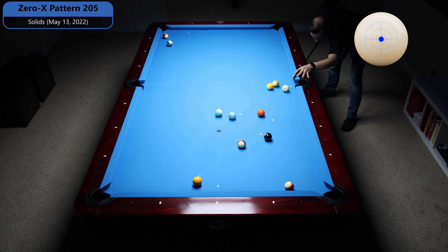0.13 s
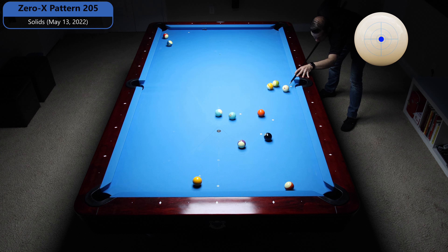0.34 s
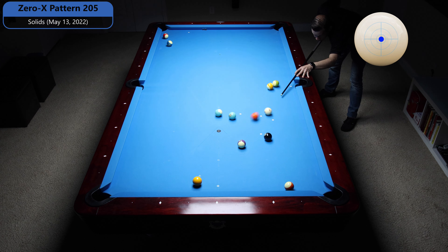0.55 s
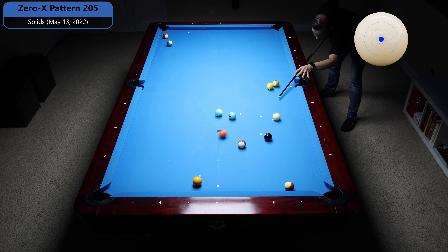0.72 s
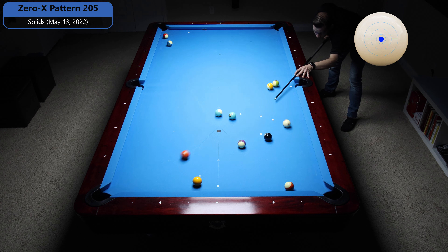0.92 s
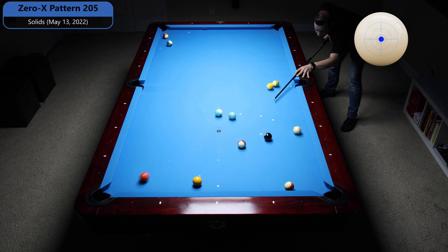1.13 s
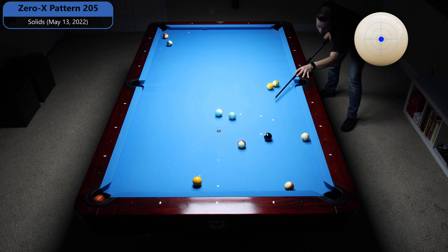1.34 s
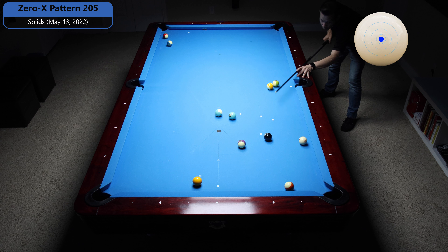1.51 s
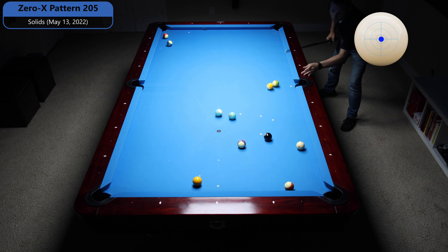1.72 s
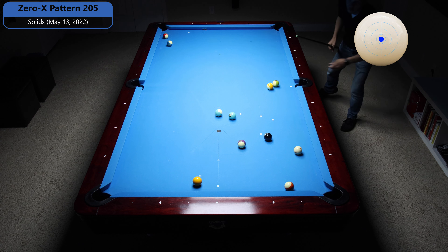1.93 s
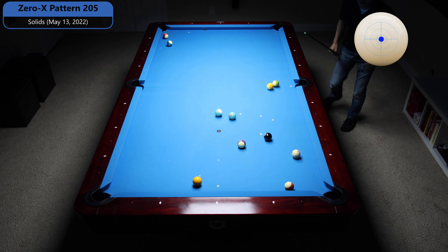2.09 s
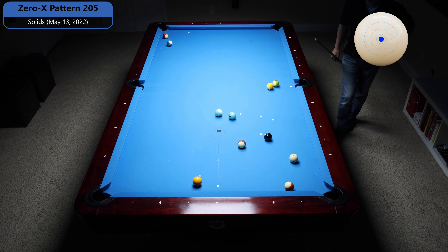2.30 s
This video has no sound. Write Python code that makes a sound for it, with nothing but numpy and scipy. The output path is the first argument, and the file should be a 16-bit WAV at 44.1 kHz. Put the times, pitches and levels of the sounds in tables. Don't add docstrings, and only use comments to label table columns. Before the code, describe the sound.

Pool shot: cue tip thumps, balls clack sharply, then a ball drops knocking into a pocket

```python
import sys
import numpy as np
from scipy import signal
from scipy.fft import rfft, irfft
from scipy.io import wavfile

SR = 44100
rng = np.random.default_rng(int(sys.argv[2]) if len(sys.argv) > 2 else 0)


def transcribe(u):
    v = np.clip(np.atleast_2d(u).T, -1, 1)
    q = np.round(v * 32767).astype(np.int16)
    wavfile.write(sys.argv[1], SR, q)


def volts(x):
    e = np.asarray(x, float) / 20
    return 10 ** e


N = 103767

# [t/s, level/dB, contact time/ms, ball ring f/Hz]
BALL_HITS = [
    (.6351, 0, .31, 2180),
    (1.5557, -7.5, 0.37, 2865),
    (1.7278, -17.5, 0.4, 2600),
    (1.8445, -23, 0.52, 2250),
    (1.8862, -25.5, 0.49, 2040),
    (1.915, -34, 0.31, 2060),
    (1.6165, -48, .1, 8000),
]
# [t/s, puff level/dB, contact time/ms, frame level/dB, scuff level/dB]
SOFT_BLOWS = [(0.4844, -11, 1.66, -13, -27.5), (0.6349, -12, 0.86, -39.5, -58),
              (1.367, -40, 1.73, -35, -95), (1.384, -50, 7.5, -32.5, -73),
              (1.485, -20.5, 1.17, -9.5, -24.5), (1.4925, -5, 2.03, -4.5, -42),
              (1.5013, -8, 1.86, -13, -49.5), (1.557, -7, 1.11, -12.5, -27.5),
              (1.7282, -13.5, 0.77, -22.5, -45), (1.885, -27.5, 1.37, -33.5, -37.5),
              (1.974, -35, 2.12, -32.5, -47), (2.029, -42.5, 1.94, -42, -53.5), (2.084, -53, 3.3, -47, -46)]
# [f/Hz, time to fall 60 dB/s, level struck on bed/dB, level struck at pocket/dB]
FRAME_MODES = [(72, 0.62, -27, -20.5), (180.2, 0.2, -9.5, -12.5), (225, 0.2, -9, -18.5),
               (302.8, 0.18, 1, 1), (462.3, .25, -8.5, -3.5), (361.5, 0.22, -7, -6), (431, 0.083, -6, -1),
               (485, 0.34, -4.5, -5), (547, 0.2, -5, -1.5), (606.5, 0.36, -9.5, -6.5), (671.7, .15, -9, -9),
               (721, 0.26, 0.5, -6.5), (820.3, 0.19, -21.5, -29.5), (1127, 0.34, -11, 1)]
# [f/Hz, width/Hz, level/dB]
SCUFF_BANDS = [(2690, 1920, 5), (1500, 900, 5), (4700, 2700, -8), (7100, 670, -15.5)]
# [t/s, level/dB]
ROLL_LEVEL = [(.5, -81), (.66, -38), (.85, -60.5), (0.969, -52.5), (1.12, -54), (1.22, -55), (1.36, -54.5),
              (1.5, -43), (1.9, -63.5), (2.34, -64)]
# [f/Hz, width/Hz, level/dB]
ROLL_TONES = [(105, 30, -6), (155, 30, -8), (230, 24, 0), (295, 40, -10), (370, 60, -18), (600, 300, -26)]
# [f/Hz, time to fall 60 dB/s, level/dB]
ROOM_DECAY = [(103, 1, -23.5), (270, 0.53, -28.5), (600, 0.45, -31), (1420, 0.3, -23.5),
              (3240, 0.37, -28.5), (6050, 0.46, -32.5), (11100, .26, -15.5)]
# [delay/ms, level/dB]
BED_REFLECTIONS = [(1.3, -8), (5.3, -16), (8.05, -5), (13.1, -12), (16.6, -15), (20.6, -13), (23.6, -9),
                   (29.4, -14)]
# [delay/ms, level/dB]
POCKET_REFLECTIONS = [(1.2, -10), (7.2, -10), (12.5, -11), (19.4, -9), (23, -10), (32, -14)]
LATE_LEVEL = [-0.5, -1]
# [f/Hz, level per Hz/dB]
NOISE_COLOUR = [(12, -39), (20, -19.5), (108, -1), (179, -19), (237, -42.5), (1050, -37), (1350, -36),
                (15200, -40), (16500, -50)]
# [f/Hz, width/Hz, level/dB]
DUCT_TONES = [(79.6, 5.2, -53.5), (113, 8.2, -57.5), (143.2, 32, -60.5)]
MOVE_TIMES = [.6, 1, 1.54, 1.7, 1.82]


def unit(x):
    return x / np.sqrt(np.mean(x ** 2) + 1e-20)


def peak(x, hz, width_hz):
    r = np.exp(-np.pi * width_hz / SR)
    return signal.lfilter((1 - r * r) / 2 * np.array([1, 0, -1]), [1, -2 * r * np.cos(2 * np.pi * hz / SR), r * r], x)


def lowpass(x, order, hz):
    return signal.lfilter(*signal.butter(order, hz, fs=SR), x)


def shaped(size, gain):
    hz = np.maximum(np.arange(size // 2 + 1) * SR / size, 1)
    return irfft(rfft(rng.standard_normal(size)) * gain(hz), size)


def add(out, s, sound):
    i = int(s * SR)
    out[i:i + len(sound)] += sound[:N - i]


def clack(db, ms, hz):
    t = np.arange(1024) / SR
    force = np.sin(np.pi * np.clip(t * 1000 / ms, 0, 1)) ** 1.5 + 1e-18
    jolt = -np.diff(force, prepend=0)
    cut_hz = 4300 * hz / 2400
    dull = signal.sosfilt(signal.butter(4, cut_hz, fs=SR, output="sos"), jolt)
    body = peak(peak(dull, hz, 1300), hz, 2700)
    skirt = peak(dull, 1600, 1600)
    spray = rng.standard_normal(1024) * volts(-60 * t / 0.008)
    edge = peak(spray, 6400, 3000) + 0.33 * peak(spray, 9100, 3600) + 0.29 * peak(spray, 16000, 3000)
    edge = peak(edge, 6300, 12000)
    parts = ((body, 0), (skirt, -16.5), (edge, -35))
    return volts(db) * sum(volts(part_db) * part / np.abs(part).max() for part, part_db in parts)


def frame_ring(push, luck, place):
    t = np.arange(SR) / SR
    twin_spread, pocket_t60_share, rise_cycles = 0.05, 0.67, 0.87
    modes = np.zeros(SR)
    for k, ((hz, t60, *levels), (level_luck, pitch_luck)) in enumerate(zip(FRAME_MODES, luck)):
        fade = volts(levels[place] + 2 * level_luck - 60 * t / (t60 * pocket_t60_share ** place))
        rise = 1 - np.exp(-t * hz / rise_cycles)
        twin_hz = hz * (1 + twin_spread * pitch_luck)
        tones = np.sin(2 * np.pi * hz * t) + 0.53 * np.sin(2 * np.pi * twin_hz * t)
        modes += (-1) ** k * fade * rise * tones
    return signal.fftconvolve(modes, push[:512] / push.sum())[:SR] / 3


def thud(db, ms, frame_db, scuff_db, luck, place):
    t = np.arange(SR) / SR
    push = (t * 3000 / ms) ** 3 * np.exp(-t * 9000 / ms) + 1e-18
    puff = peak(-np.diff(push, prepend=0), 900 / ms, 1300 / ms)
    puff = signal.lfilter(*signal.butter(2, 200, "high", fs=SR), puff)
    grit = lowpass(rng.standard_normal(SR), 4, 8500)
    scuff = sum(volts(band_db) * peak(peak(grit, hz, width), hz, width) for hz, width, band_db in SCUFF_BANDS)
    scuff *= 1 - np.exp(-t / 0.0064)
    scuff *= volts(scuff_db - 60 * t / 0.067)
    return volts(db) * puff / np.abs(puff).max() + volts(frame_db) * frame_ring(push, luck, place) + scuff


def rolling():
    s, db = np.transpose(ROLL_LEVEL)
    weave = rng.standard_normal(N)
    body = sum(volts(tone_db) * unit(peak(peak(weave, hz, width), hz, 2 * width))
               for hz, width, tone_db in ROLL_TONES)
    return volts(np.interp(np.arange(N) / SR, s, db)) * unit(body)


def room(place):
    t = np.arange(SR) / SR
    hz, t60, db = np.transpose(ROOM_DECAY)
    near_db, near_t60_s = (-24.5, -19)[place], 0.018
    early = volts(near_db - 60 * t / near_t60_s) * rng.standard_normal(SR) * (t > 0.0006)
    for ms, echo_db in (BED_REFLECTIONS, POCKET_REFLECTIONS)[place]:
        early[int(ms * SR / 1000)] += volts(echo_db)
    late = np.zeros(SR)
    for mid in 62.5 * 2 ** np.arange(9):
        band = shaped(SR, lambda f: np.cos(np.pi / 2 * np.clip(np.log2(f / mid), -1, 1)))
        band_db = np.interp(np.log(mid), np.log(hz), db)
        band_t60 = np.interp(np.log(mid), np.log(hz), t60)
        late += band * volts(LATE_LEVEL[place] + band_db - 60 * t / band_t60)
    late *= 1 - np.exp(-(t / 0.012) ** 2)
    late[0] += 1
    return late + lowpass(early, 1, 6000)


def background():
    hz, db = np.transpose(NOISE_COLOUR)
    wide = shaped(N, lambda f: volts(np.interp(np.log(f), np.log(hz), db)))
    ducts = sum(volts(duct_db) * unit(peak(rng.standard_normal(N + SR), f, width)[SR:])
                for f, width, duct_db in DUCT_TONES)
    return volts(-53.5) * unit(wide) + ducts


def scene():
    spots = np.zeros((len(MOVE_TIMES) + 1, N))
    paths = [room(int(k > 1)) for k in range(len(spots))]
    for s, *hit in BALL_HITS:
        add(spots[np.searchsorted(MOVE_TIMES, s)], s, clack(*hit))
    for s, *blow in SOFT_BLOWS:
        luck = rng.standard_normal((len(FRAME_MODES), 2))
        add(spots[np.searchsorted(MOVE_TIMES, s)], s, thud(*blow, luck, int(s > 1)))
    contacts = sum(signal.fftconvolve(spot, path)[:N] for spot, path in zip(spots, paths))
    return (contacts + rolling() + background())[None]


def low_pass(x):
    return signal.sosfilt(signal.butter(12, 16770, fs=SR, output="sos"), x)


def record(dry):
    mix = np.clip(dry, -0.97, 0.97)
    return low_pass(mix)


dry = scene()
out = record(dry)
transcribe(out)
```